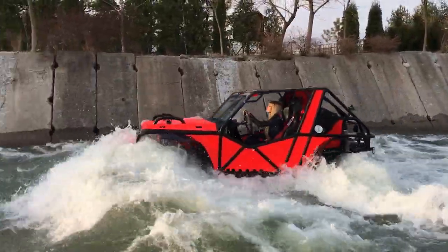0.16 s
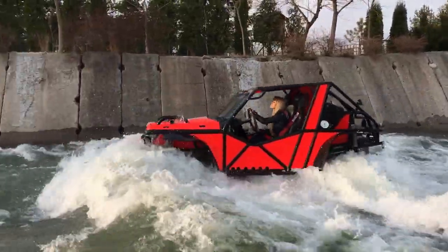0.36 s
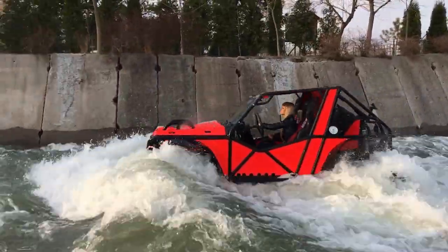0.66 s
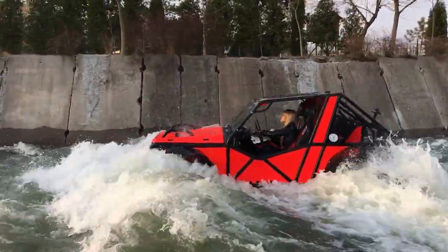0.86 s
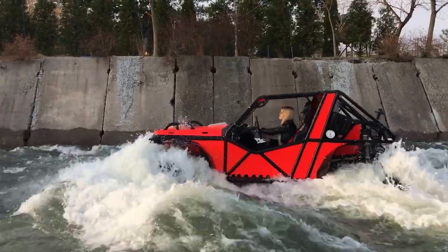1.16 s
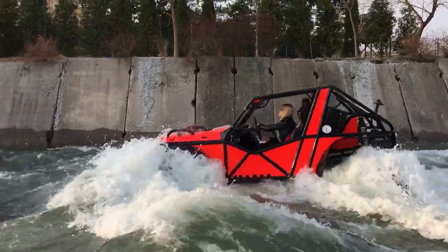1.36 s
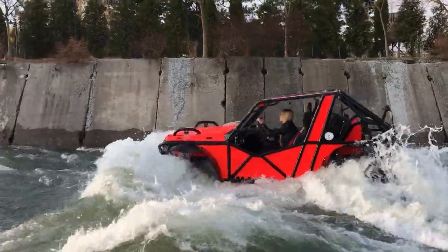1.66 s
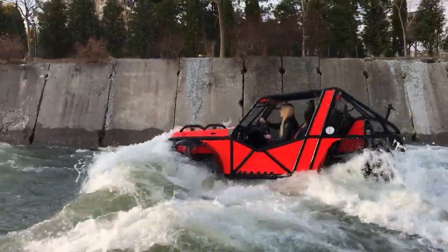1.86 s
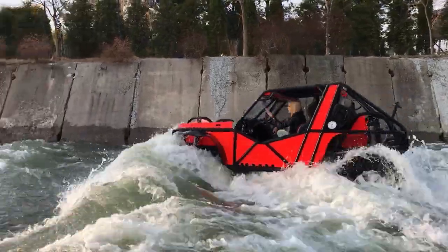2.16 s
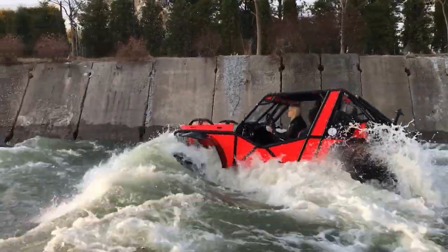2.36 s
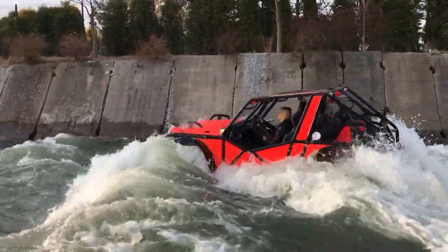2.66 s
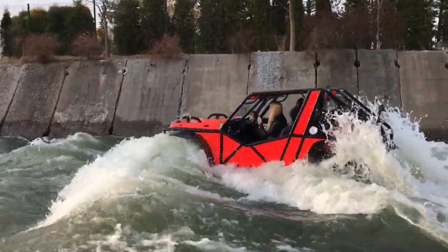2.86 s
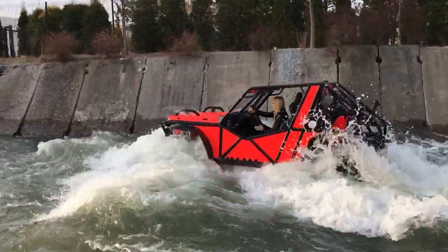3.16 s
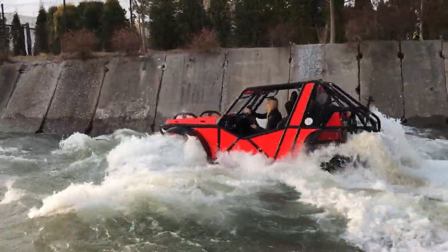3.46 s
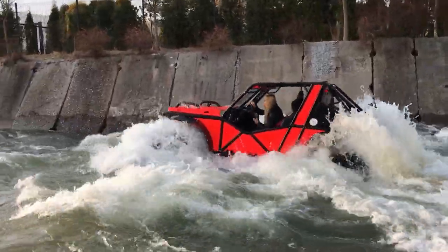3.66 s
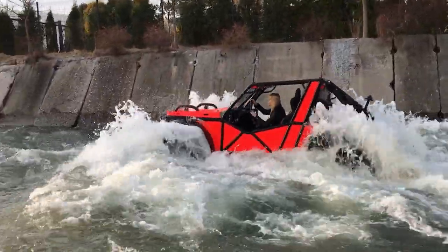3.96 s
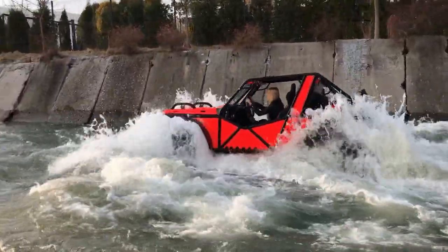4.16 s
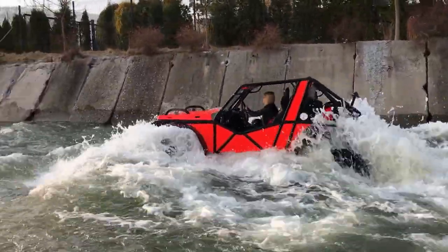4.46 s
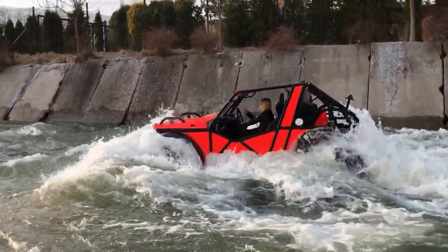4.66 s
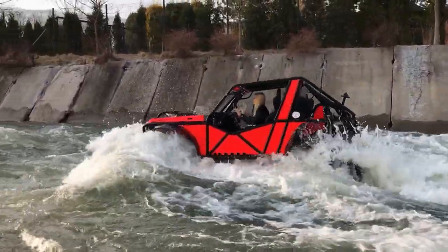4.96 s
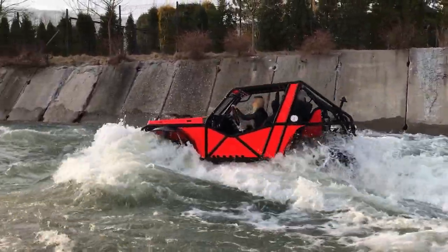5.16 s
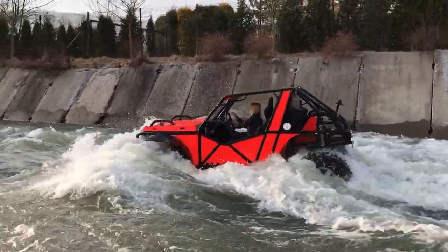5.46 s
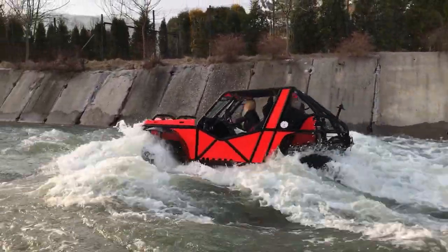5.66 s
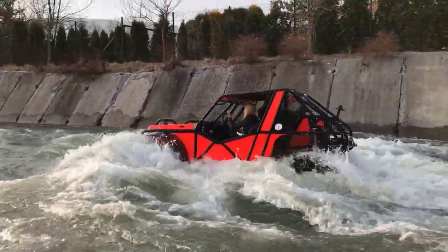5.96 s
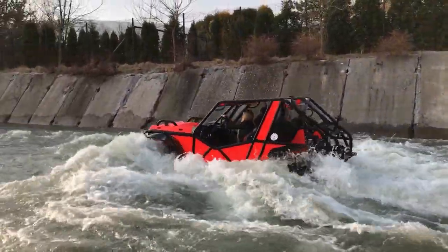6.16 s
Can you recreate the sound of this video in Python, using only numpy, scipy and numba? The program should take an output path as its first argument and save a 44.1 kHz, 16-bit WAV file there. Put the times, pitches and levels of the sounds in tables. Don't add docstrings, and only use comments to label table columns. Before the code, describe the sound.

Rushing white water hisses steadily, swelling and thinning, with fizzing spray and occasional round bubble plops. Over it, a deep, uneven engine growls in three pushes, the last longest and highest, each dragged down by the water. Passing waves choke and dull the tailpipes. Finally the engine drops to a wavering low burble. Outdoors, heard by a phone from the bank, light on deepest bass, with a quick slap off concrete.

```python
import sys
import numpy as np
from scipy import signal
from scipy.fft import rfft, irfft, next_fast_len
from scipy.io import wavfile
from scipy.ndimage import uniform_filter1d
from numba import njit

SR = 44100
rng = np.random.default_rng(int(sys.argv[2]) if len(sys.argv) > 2 else 0)


def voltage_ratio(level):
    return 10 ** (np.asarray(level, float) / 20)


def to_wav(sig):
    pcm = np.clip(np.atleast_2d(sig), -1, 1) * 32767
    pcm = np.round(pcm).astype(np.int16)
    wavfile.write(sys.argv[1], SR, pcm.T)


N = 278712


def unit(x):
    return x / np.sqrt(np.mean(x ** 2))


def curves(table):
    s, *columns = np.transpose(table)
    return [np.interp(np.arange(N) / SR, s, column) for column in columns]


def response_db(table, hz):
    point_hz, point_db = np.transpose(table)
    return np.interp(np.log(hz), np.log(point_hz), point_db)


@njit
def svf(x, hz, width):
    y, band, low = np.empty(len(x)), 0., 0.
    g, k = np.tan(np.pi * hz / SR), width / hz
    for i in range(len(x)):
        v = (band + g * (x[i] - low)) / (1 + g * (g + k))
        band, low, y[i] = 2 * v - band, low + 2 * g * v, k * v
    return y


@njit
def grains(rows, n):
    y = np.zeros(n)
    for s, hz, cycles, size, glide in rows:
        i, length, phase = int(s * SR), int(5 * cycles * SR / hz), 0.
        for j in range(min(length, n - i)):
            y[i + j] += size * np.exp(-5 * j / length) * np.sin(phase)
            phase += 2 * np.pi * hz * (1 + glide * j / length) / SR
    return y


def walk(rate_hz):
    hold = int(SR / rate_hz)
    levels = np.repeat(rng.standard_normal(N // hold + 1), hold)
    return 1.22 * uniform_filter1d(uniform_filter1d(levels, hold), hold)[:N]


# time_s, cycle_rate_hz
REVS = [(0.0, 15.4), (0.36, 14.07), (0.64, 21.46), (0.88, 22.76), (1.23, 17.43), (1.61, 15.58),
        (2.09, 15.88), (2.39, 23.58), (2.63, 23.63), (3.06, 18.22), (3.44, 25.54), (3.94, 29.67),
        (4.07, 28.24), (4.15, 23.46), (4.33, 20.81), (4.73, 21.34), (4.97, 16.1), (6.32, 15.75)]


def revs():
    hunt_from_s, hunt_period_s, hunt_hz = 4.87, .61, .56
    since_s = np.maximum(np.arange(N) / SR - hunt_from_s, 0)
    hunt = -hunt_hz * np.sin(2 * np.pi * since_s / hunt_period_s)
    return uniform_filter1d(curves(REVS)[0] + hunt, size=3000)


# time_s, throttle_db (below wide open)
THROTTLE = [(0.0, -12.6), (0.23, -16.7), (0.47, -1.1), (0.81, -3.2), (0.97, -13.5), (1.33, -13.5),
            (2.02, -11.7), (2.31, 0.7), (2.65, -0.7), (2.77, -13.9), (2.99, -12.1), (3.18, 0.8),
            (3.25, -1.5), (3.88, -0.8), (4.37, -10.1), (4.85, -10.4), (5.12, -12.5), (6.32, -14.6)]


def throttle():
    return curves(THROTTLE)[0]


# middle_s, half_length_s, thump_loss_db, firing_note_loss_db, bark_loss_db
DUNKS = [(0.06, 0.1, 0, 0, 3), (0.32, 0.09, 0, 0, -5), (0.9, 0.12, 0, 0, -3.5), (1.08, 0.17, 4.8, -8, 3.5),
         (1.27, 0.06, 0, 0, -3), (1.38, 0.13, -2.4, -6.8, -2.5), (2.71, 0.08, 0, 0, 3.5),
         (2.9, 0.09, 5.6, 15.2, 0), (3.33, 0.08, 0, 0, 5), (3.45, 0.15, 2.8, 2, 2.7),
         (3.63, 0.07, -3.4, -2.3, 0), (3.87, 0.19, 2, 14.6, 7.7), (4.13, 0.1, 17, 14, 1.5),
         (4.31, 0.05, 2.7, 0, 0), (4.76, 0.06, -2.2, -4.8, 1.6), (4.91, 0.06, 20, 13.6, 7),
         (5.05, 0.2, -1, -6.5, -.7), (5.3, 0.1, 0, 0, -3), (5.55, 0.09, 3.6, -3.8, 0),
         (5.96, 0.15, 3.3, -5, 0), (6.22, .12, 0, 0, -5), (6.26, 0.09, 7.4, 10.4, 0)]


def dunks():
    t = np.arange(N) / SR
    return sum(np.outer(loss_db, np.exp(-((t - s) / half) ** 2)) for s, half, *loss_db in DUNKS)


# order (multiple of the cycle rate), level_db (wide open), throttle_share
STRONG = [
    (3, -24.4, 1.43),
    (5, -15.1, .5),
    (8, -12.8, 1.06),
]
# pitch_hz, level_db
SILENCER = [(45, 0), (62, 4.5), (80, .5), (100, -3), (130, -5.5), (170, -3.5), (210, -10), (240, -6.5)]


def strong_db(cycle_hz, throttle_db, thump_db, note_db):
    losses = (-0.42 * thump_db, thump_db, note_db)
    return [db + share * throttle_db - loss_db + response_db(SILENCER, order * cycle_hz)
            for (order, db, share), loss_db in zip(STRONG, losses)]


def brightness(cycle_hz, note_db, muffle_db):
    idle_db, per_hz_db, per_pull_db, water_share = -1.7, 0.18, 0.1761, 0.76
    pull_hz_per_s = uniform_filter1d(np.gradient(cycle_hz) * SR, size=6600)
    water_db = water_share * (np.maximum(note_db, 0) + muffle_db)
    return idle_db + per_hz_db * (cycle_hz - cycle_hz.min()) + per_pull_db * pull_hz_per_s - water_db


def order_wave(turns, cycle_hz, order, db, flutter_db):
    step = ((5 * order + 3) % 8 - 3) * np.pi / 8
    lead = 1.1 + 2 * np.pi * .0042 * np.maximum(order * cycle_hz - 225, 0)
    slip = .025 * order ** 1.35 * walk(14)
    level = np.sqrt(2) * voltage_ratio(db + flutter_db * walk(25))
    return level * np.cos(2 * np.pi * order * turns + step + lead + slip)


# order (multiple of the cycle rate), level_db
UPPER = [(4, -8), (6, -10), (7, -6), (9, -7), (10, 0), (11, -6), (12, -11), (13, -2), (14, -15), (15, -15),
         (16, -4), (18, -5), (19, -11), (21, -6), (23, -13), (24, -14), (26, -16), (29, -15)]
# pitch_hz, level_db
TAILPIPE = [(60, -31), (120, -2), (155, 6), (200, 1.5), (245, 0), (310, -8.5), (355, -1.5), (400, -3.5),
            (455, -1.5), (550, -1), (700, -5), (900, -20)]


def drone(turns, cycle_hz, third_db, fifth_db, eighth_db, bark_db, bright_db):
    rock_db = third_db - 9
    strong = zip((2, 3, 5, 8), (rock_db, third_db + .5, fifth_db + .5, eighth_db + .5))
    wave = sum(order_wave(turns, cycle_hz, order, db, flutter_db=.6) for order, db in strong)
    stroke_db = -1.23 + 1.8 * walk(60)
    for order, db in UPPER:
        line_hz = order * cycle_hz
        tilt_db = bright_db * np.log2(np.maximum(line_hz / 220, 1))
        line_db = bark_db + stroke_db + db + response_db(TAILPIPE, line_hz) + tilt_db
        wave += order_wave(turns, cycle_hz, order, line_db, flutter_db=2.0)
    return wave


FIRING_DB = [0, -9, -8, -2, -10, -4, -3, -7]
# pitch_hz, width_hz, level_db
PIPE = [(52, 30, -9), (100, 50, -17), (170, 60, 0), (230, 60, -3), (370, 90, -9), (480, 120, -12)]


def bark(turns, bark_db, rough_db=-5, rasp_db=-16, puff_slots=0.75):
    slot = np.floor(8 * turns).astype(int)
    uneven = rng.uniform(-1, 1, 2000)
    starts = np.flatnonzero(np.diff(slot))
    pulses = np.zeros(N)
    pulses[starts] = uneven[slot[starts]]
    pipe = 0
    for k, (hz, width, db) in enumerate(PIPE):
        ring = svf(svf(pulses, 1. * hz, 1.8 * width), 1. * hz, 1.8 * width)
        pipe = pipe + (-1) ** k * voltage_ratio(db) * ring
    steady = pipe / np.sqrt(uniform_filter1d(pipe ** 2, 8000))
    gate = voltage_ratio(FIRING_DB)[slot % 8] * np.exp(-(8 * turns - slot) / puff_slots)
    rasp = svf(svf(gate * rng.standard_normal(N), 990.0, 800.0), 990.0, 800.0)
    return voltage_ratio(bark_db) * (voltage_ratio(rough_db) * steady + voltage_ratio(rasp_db) * unit(rasp))


# time_s, hiss_db
RIVER = [(0.0, -35.5), (0.2, -35), (0.56, -37), (0.69, -40), (1.41, -37.5), (1.65, -36.5), (2.08, -37),
         (2.71, -41.5), (3.03, -36.5), (3.26, -40), (3.5, -40.5), (3.71, -42), (4.05, -39.5), (4.26, -38),
         (4.72, -37.5), (5.19, -40.5), (5.35, -38.5), (6.32, -39)]
# pitch_hz, level_db (per Hz)
RUSH = [(30, 2), (70, 12.5), (200, -0.5), (450, -5.5), (760, -8), (1100, -6), (1600, -9), (2200, -13),
        (3000, -12), (4500, -15.5), (7000, -20), (11000, -22.5), (16000, -22.5)]


def river(swell_db=0.43, shared_db=0.48, own_db=0.23, fizz_db=-12, count=12000):
    hiss_db = curves(RIVER)[0]
    change_db = hiss_db - np.mean(hiss_db)
    rush_db, spray_db = -32.5 + 0.74 * change_db, -41.5 + change_db
    chance = rng.random((count, 4))
    start_s, pitch_hz = chance[:, 0] * N / SR, 500 * 2 ** (4.44 * chance[:, 1])
    size = voltage_ratio(-2.5 * np.log(chance[:, 2] + 1e-3))
    cycles, glide = 0.37 + 3.2 * chance[:, 3], np.full(count, 0.33)
    fizz = grains(np.column_stack([start_s, pitch_hz, cycles, size, glide]), N)
    length = next_fast_len(N)
    octave = np.log2(np.arange(length // 2 + 1) * SR / length + 1)
    point_hz, point_db = np.transpose(RUSH)
    source = rfft(rng.standard_normal(N) + voltage_ratio(fizz_db) * unit(np.diff(fizz, prepend=0)), length)
    source = source * voltage_ratio(np.interp(octave, np.log2(point_hz), point_db))
    out, swell, shared = 0, walk(4.7), walk(13.0)
    for centre in np.arange(4, 14.5, .5):
        shared = 0.68 * shared + 0.8 * walk(20)
        db = swell_db * swell + shared_db * shared + own_db * walk(8.3)
        db = db + np.clip((centre - 11.3) / 0.76, 0, 1) * (spray_db - rush_db + 8)
        band = source * np.clip(1 - 2 * abs(octave - centre), 0, 1)
        out = out + voltage_ratio(db) * irfft(band, length)[:N]
    return voltage_ratio(rush_db) * out / np.std(svf(out, 1370.0, 4700.0))


# start_s, peak_db, pitch_hz
PLOPS = [(0.088, -23, 1370), (0.48, -22.5, 1610), (1.547, -19, 1800), (1.564, -24, 1110),
         (1.733, -17, 1930), (2.333, -25, 1070), (2.369, -24, 1285), (2.499, -21, 1020), (2.758, -25, 970),
         (3.021, -20, 920), (3.501, -21, 1320), (3.543, -21.5, 1260), (3.913, -23, 920), (3.925, -25, 1300),
         (4.035, -30, 960), (4.564, -29, 1310), (4.701, -27, 1130), (5.23, -28, 1100), (5.573, -26, 1080),
         (6.031, -24, 1250), (6.248, -28, 1570)]


def plops(cycles=3.0, glide=.15, trim_db=-1, spray_db=-12, spray_s=.018):
    s, db, hz = np.transpose(PLOPS)
    bubbles = grains(np.column_stack([s, hz, cycles + 0 * s, voltage_ratio(db + trim_db), glide + 0 * s]), N)
    puffs = np.zeros(N)
    puffs[(s * SR).astype(int)] = voltage_ratio(db + spray_db)
    fading = signal.lfilter([1], [1, -np.exp(-1 / (spray_s * SR))], puffs)
    spray = uniform_filter1d(fading, 200) * unit(svf(rng.standard_normal(N), 1330.0, 2000.0))
    return svf(bubbles, 1200.0, 2400.) + spray


def scene():
    cycle_hz, throttle_db = revs(), throttle()
    thump_db, note_db, muffle_db = dunks()
    bark_db = -27 + 0.66 * throttle_db - muffle_db
    bright_db = brightness(cycle_hz, note_db, muffle_db)
    turns = np.cumsum(cycle_hz * (1 + .002 * walk(20))) / SR
    rough = bark(turns, bark_db)
    wall = voltage_ratio(-1.5) * np.roll(rough, int(.031 * SR))
    strong = strong_db(cycle_hz, throttle_db, thump_db, note_db)
    lines = drone(turns, cycle_hz, *strong, bark_db, bright_db)
    return (lines + rough + wall + river() + plops())[None]


def roll_off(x):
    return signal.sosfilt(signal.butter(12, 15700, fs=SR, output="sos"), x)


# pitch_hz, width_hz, depth (0-1)
NOTCH = [(4950, 450, .3), (7650, 800, .32), (10400, 750, .4)]


def record(dry):
    x = signal.sosfiltfilt(signal.butter(2, 39, "high", fs=SR, output="sos"), dry[0])
    x = np.tanh(.8 * x) / .8
    for hz, width, depth in NOTCH:
        x = x - depth * svf(x, 1. * hz, 1. * width)
    return roll_off(x[None])


dry = scene()
out = record(dry)
to_wav(out)
```